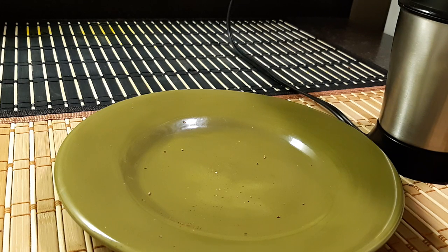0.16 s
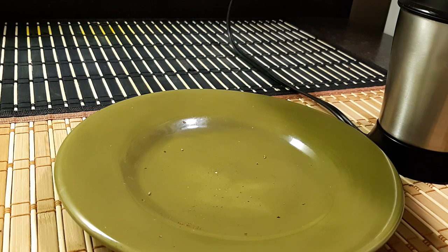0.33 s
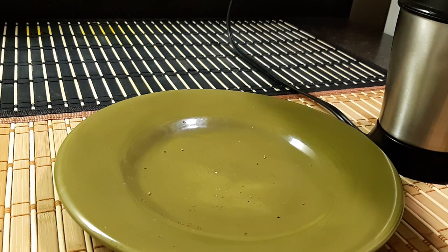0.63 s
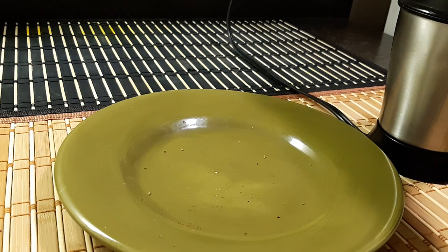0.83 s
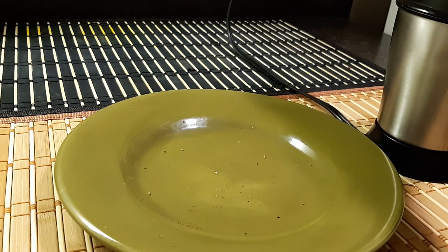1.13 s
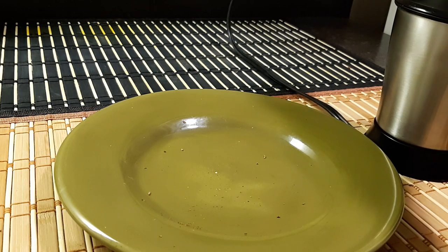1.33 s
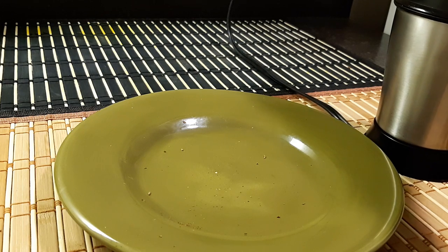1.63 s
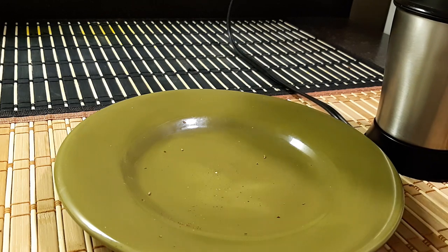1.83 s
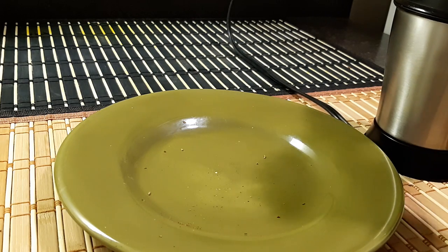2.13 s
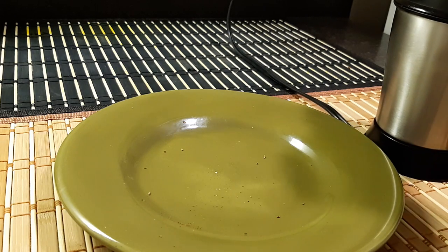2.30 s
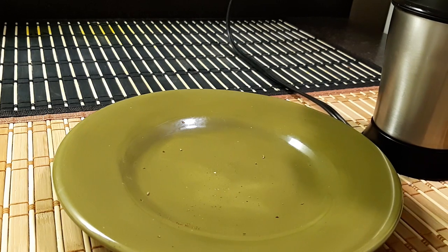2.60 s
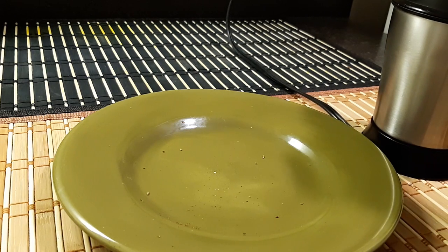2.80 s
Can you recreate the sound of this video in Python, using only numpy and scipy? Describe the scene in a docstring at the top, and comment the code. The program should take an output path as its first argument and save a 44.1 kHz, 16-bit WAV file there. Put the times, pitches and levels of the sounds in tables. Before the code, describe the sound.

Electric blade grinder crunches hard spices, cuts out to near silence, then restarts with a loud burst

```python
"""Hard spices crushed in a blade grinder on a kitchen table: broadband grit from ticks and rushing air.
Damped modes of the steel cup and plastic base ring as pieces knock; a wavering sine is the shaft whine.
The grinder slows and falls silent, and tones of a fridge, present throughout, are heard in the pause.
A hand creaks the lid, the blade scrapes, and the base booms as the motor runs up to speed again.
The phone stands close, on the grinder's right; decaying noise gives the room's answer."""
import sys
import numpy as np
from scipy import signal
from scipy.fft import rfft, irfft
from scipy.io import wavfile
from scipy.ndimage import uniform_filter1d, map_coordinates

SR = 44100
rng = np.random.default_rng(int(sys.argv[2]) if len(sys.argv) > 2 else 0)


def nominal_scale(level):
    """Amplitude ratio for a level in decibels (scalar or array-like)."""
    x = np.asarray(level, float) / 20
    return 10 ** x


def persist_wave(psi):
    """Save psi, clipped to +-1, as 16-bit WAV."""
    counts = np.round(np.clip(psi, -1, 1) * 32767).astype(np.int16)
    wavfile.write(sys.argv[1], SR, np.atleast_2d(counts).T)


N = 130095


def unit(x):
    """Normalization of signal power: scale to rms 1."""
    return x / np.sqrt(np.mean(x ** 2))


def curve(rows, order):
    """Linear interpolation: one column of a table as a line in time."""
    r = np.array(rows, float)
    return np.interp(np.arange(N) / SR, r[:, 0], r[:, order])


def colour(x, points):
    """Minimum-phase filtering: a folded cepstrum gives the (Hz, dB) shape a causal response."""
    p, n = np.array(points, float), 4096
    hz = np.arange(n // 2 + 1) * SR / n
    shape_db = np.interp(np.log(hz + 1), np.log(p[:, 0]), p[:, 1])
    cepstrum = irfft(np.log(nominal_scale(shape_db)))
    cepstrum[1:n // 2] *= 2
    cepstrum[n // 2 + 1:] = 0
    response = irfft(np.exp(rfft(cepstrum)))
    x = np.atleast_2d(x)
    return signal.fftconvolve(x, response[None], axes=1)[:, :x.shape[1]]


def walk(rate):
    """Slow random modulation: random levels, rate a second, joined smoothly; rms 1."""
    levels = rng.standard_normal(size=200)
    return unit(map_coordinates(levels, [np.arange(N) * rate / SR], order=3, mode="mirror"))


def ring(modes, scatter_db):
    """Modal superposition: a struck body answers as a sum of damped sines, scaled to peak 1."""
    t = np.arange(4000)[:, None] / SR
    hz, db, t60 = np.array(modes, float).T
    y = (nominal_scale(db + scatter_db) * np.sin(2 * np.pi * hz * t) * 1000. ** (-t / t60)).sum(axis=1)
    return y / np.abs(y).max()


def filtered(x, order, hz, kind="low"):
    """Butterworth response: maximally flat in the band that passes."""
    return signal.sosfilt(signal.butter(order, hz, kind, fs=SR, output="sos"), x)


def pan(db):
    """Level difference between the ports: left over right by db, as two gains."""
    return nominal_scale(np.array([[db], [-db]]) / 2)


# Churning load. Each row: time in seconds, grit level in dB rms before its random swings,
# rattle level in dB above the grit.
CHURN_LEVELS = [(0, -32, -10), (.2, -35, -8.5), (.55, -35, -8.5), (1.07, -34, -9.5), (1.2, -31.5, -9.5),
                (1.36, -33.5, -5), (1.4, -50, -20), (1.45, -93, -4), (2.424, -85, 0), (2.429, -41, -0.5),
                (2.46, -34.5, -5.5), (2.5, -34.5, -7), (2.55, -30.5, 1.5), (2.575, -21, -5),
                (2.6, -17, -12), (2.67, -17, -6), (2.71, -18.5, -18.5), (2.78, -24, -10), (2.86, -30, -8),
                (2.95, -31, -8)]
# Spectrum of grit on steel, also that of a crack. Each row: frequency in Hz, relative density in dB per Hz.
GRIT_SPECTRUM = [(880, -40), (1500, -16), (2200, -1.5), (3000, 4.5), (4330, 4.5), (6900, 3), (7700, -2),
                 (10000, 3), (12000, 4.5), (14800, 2), (16000, 3.5)]
# Spectrum of the rattling body. Each row: frequency in Hz, relative density in dB per Hz.
RATTLE_SPECTRUM = [(85, -31), (125, -3.5), (226, -9.5), (390, 2.5), (500, -8), (893, 1), (1400, -13.5),
                   (1750, -7.5), (3250, -13.5)]
# Resonances of lid, cup air and base. Each row: frequency in Hz, width in Hz, level in dB re the rattle.
CAVITY_RESONANCES = [(428, 30, -15), (512, 30, -17), (1125, 30, -13), (1300, 120, -6)]
GRAINS_PER_S, GRAIN_S, GRAIN_SPREAD_DB = 2800, 0.00015, 4
GRAIN_SHARE = 0.62  # power share of the ticks; the rest is steady rushing air
TUMBLE_DB = 2.21
FLICKER_DB, FLICKER_HZ = 2.5, 4500  # lower, middle and upper grit come and go separately
HISS_HZ, HISS_DB_PER_OCTAVE = 9200, 7  # the top of the grit fades as the blade slows


def churn():
    """Shot noise: random ticks in rushing air, and a resonant body rattle. Rows: whole cup, left, right."""
    struck, size = rng.random((2, N))
    grains = (struck < GRAINS_PER_S / SR) * nominal_scale(-GRAIN_SPREAD_DB * np.log(1 - .98 * size))
    grains = signal.lfilter([1], [1, -np.exp(-1 / (GRAIN_S * SR))], grains)
    envelope = np.sqrt(GRAIN_SHARE * unit(grains) ** 2 + 1 - GRAIN_SHARE)
    grit_drive, rattle_drive = envelope * rng.standard_normal(size=(2, 3, N))

    rattle = unit(colour(rattle_drive, RATTLE_SPECTRUM))
    for hz, width, db in CAVITY_RESONANCES:
        resonance = signal.lfilter(*signal.iirpeak(hz, hz / width, SR), rattle_drive)
        rattle = rattle + nominal_scale(db) * unit(resonance)

    # split the grit into three bands without phase shift
    grit = unit(colour(grit_drive, GRIT_SPECTRUM))
    dull = signal.sosfiltfilt(signal.butter(2, HISS_HZ, fs=SR, output="sos"), grit)
    under = signal.sosfiltfilt(signal.butter(2, FLICKER_HZ, fs=SR, output="sos"), dull)
    octaves = np.log2(curve(SHAFT_SPEED, order=1) / SHAFT_SPEED[0][1])
    lower = under * nominal_scale(FLICKER_DB * walk(55))
    middle = (dull - under) * nominal_scale(FLICKER_DB * walk(55))
    upper = (grit - dull) * nominal_scale(FLICKER_DB / 2 * walk(45) + HISS_DB_PER_OCTAVE * octaves)

    tumble = TUMBLE_DB * walk(35)
    level = curve(CHURN_LEVELS, order=1)
    rattle_level = level + curve(CHURN_LEVELS, order=2) + 0.43 * tumble + 0.79 * walk(20)
    return nominal_scale(level + tumble) * (lower + middle + upper) + nominal_scale(rattle_level) * rattle


# Pieces knocking the cup. Each row: start in seconds, peak of the crack in dB, thud in dB above the crack.
KNOCK_EVENTS = [(0.0157, -12.5, -21), (0.0979, -15, -24), (0.142, -11, -8.5), (0.208, -11.5, -27),
                (0.327, -15.5, -11.5), (0.3626, -16, -11.5), (0.4401, -19, -16), (0.5793, -16.5, -18.5),
                (0.6657, -14, -18), (0.8181, -17.5, -14.5), (0.884, -14, -19), (0.9424, -14.5, -13),
                (0.9931, -13.5, -12.5), (1.0229, -14, -29), (1.0965, -3, -19.5), (1.1587, -12.5, -31),
                (1.2318, -12, -46), (1.2717, -10.5, -12.5), (1.3202, -13, -3), (1.3487, -23, -24),
                (2.5718, -5, -8.5), (2.5946, -12, 6.5), (2.648, -7.5, -37), (2.6613, -4.5, -28),
                (2.681, -9, -8), (2.7248, -7, -38), (2.8, -10.5, -14), (2.8913, -12.5, -21)]
# Steel cup modes. Each row: frequency in Hz, relative level in dB before scatter, decay time t60 in seconds.
CUP_MODES = [(3683, -3, 0.05), (4730, -5.5, 0.034), (5320, -2, 0.047), (6380, 6, 0.036), (6500, -7, 0.031),
             (7010, 6, 0.031), (8420, -5.5, 0.05), (12500, -11, .03), (14500, -0.5, .03)]
# Plastic base modes. Each row: frequency in Hz, relative level in dB, decay time t60 in seconds.
BASE_MODES = [(330, -3, .05), (430, -1, .04), (590, 0, .04), (850, -3, .03)]
CUP_SCATTER_DB, RING_DB = 7.5, -15  # ring peak relative to the crack
BITE_S, CRACK_S = 0.00034, 0.007  # time constants of a crack's rise and decay


def knocks():
    """Impact excitation: each piece cracks, rings the cup and thuds the base; rows as in churn."""
    t = np.arange(4000) / SR
    out = np.zeros((3, N + len(t)))
    envelope = np.exp(-t / CRACK_S) - np.exp(-t / BITE_S)
    for start, db, thud_db in KNOCK_EVENTS:
        crack = colour(rng.standard_normal((3, len(t))) * envelope, GRIT_SPECTRUM)
        scatter = CUP_SCATTER_DB * rng.standard_normal((3, len(CUP_MODES)))
        rings = np.array([ring(CUP_MODES, row) for row in scatter])
        thud = ring(BASE_MODES, rng.standard_normal(len(BASE_MODES)))
        hit = crack / np.abs(crack).max() + nominal_scale(RING_DB) * rings + nominal_scale(thud_db) * thud
        i = int(start * SR)
        out[:, i:i + len(t)] += nominal_scale(db) * hit
    return out[:, :N]


# Slow blade scraping the wall. Each row: start in seconds, initial level in dB rms.
RASP_EVENTS = [(2.452, -34), (2.519, -32)]
RASP_HZ, RASP_DECAY_S = 5330, .012


def rasps():
    """Resonance under friction: short scrapes excite one narrow ring of the cup."""
    t = np.arange(N) / SR
    scrape = unit(signal.lfilter(*signal.iirpeak(RASP_HZ, 20, SR), rng.standard_normal(N)))
    return scrape * sum(nominal_scale(db) * (t > s) * np.exp(-np.abs(t - s) / RASP_DECAY_S) for s, db in RASP_EVENTS)


# Shaft whine. Each row: time in seconds, frequency in Hz and level in dB rms, both before random wavering.
SHAFT_SPEED = [(0, 343, -37), (.15, 342, -34), (.92, 342, -35), (.985, 336, -34), (1.04, 327, -38.5),
               (1.065, 305, -45), (1.09, 297, -42), (1.12, 275, -99), (2.43, 39.95, -99), (2.68, 203, -60),
               (2.755, 250, -36), (2.81, 278, -52), (2.87, 301, -36.5), (2.95, 320, -60)]
# Base shaking on the table at the restart. Each row: time in seconds, boom in dB rms before wavering,
# rough rumble in dB rms.
BASE_SHAKE = [(2.424, -88, -89), (2.43, -53, -34), (2.49, -55, -34), (2.52, -25, -31), (2.55, -34, -21.5),
              (2.593, -18, -23), (2.63, -23.5, -26), (2.67, -42.5, -34.5), (2.95, -47.5, -49)]
BOOM_HZ = 125.2  # centre of the wavering boom
MOTOR_PAN_DB = -0.5  # the motor side faces the right port


def motor():
    """Rotating unbalance: the shaft whines, and the base booms and rumbles as the rotor runs up."""
    whine_phase = 2 * np.pi * np.cumsum(curve(SHAFT_SPEED, order=1) * (1 + .003 * walk(28))) / SR
    whine = np.sin(whine_phase) * nominal_scale(1.8 * walk(27) + curve(SHAFT_SPEED, order=2))
    boom_phase = 2 * np.pi * np.cumsum(BOOM_HZ * (1 + 0.052 * walk(25))) / SR
    boom = np.sin(boom_phase) * nominal_scale(0.88 * walk(40) + curve(BASE_SHAKE, order=1))
    rumble = unit(filtered(rng.standard_normal(N), 2, [100, 600], "band"))
    rumble = rumble * nominal_scale(curve(BASE_SHAKE, order=2))
    return np.sqrt(2) * (whine * pan(MOTOR_PAN_DB) + boom) + rumble  # root 2: sine peak over rms


PRESS_S, PRESS_SWELL_S, PRESS_DB = 2.385, 0.05, -60  # a hand leans on the lid


def press():
    """Forced modal vibration: the hand's weight creaks softly through the base before the restart."""
    t = np.arange(N) / SR
    modes = [(188, 0.0018, 0.16), *BASE_MODES[:2]]
    creak = signal.fftconvolve(rng.standard_normal(N), ring(modes, 0))[:N]
    return nominal_scale(PRESS_DB) * unit(creak) * np.exp(-((t - PRESS_S) / PRESS_SWELL_S) ** 2)


# Fridge compressor tones. Each row: frequency in Hz, level in dB rms before wavering.
FRIDGE_TONES = [(188.4, -72), (253.0, -81.5), (328.4, -69), (473.7, -77.5), (613.7, -81.5), (3499, -89.5)]
# Spectrum of room air. Each row: frequency in Hz, relative density in dB per Hz.
AIR_SPECTRUM = [(40, -24), (329, 2.5), (516, -7.5), (810, -16), (990, -22), (2900, -43.5), (3520, -27),
                (4100, -42), (6000, -44), (6750, -28), (7400, -45.5), (16000, -48.5)]
AIR_DB = -64  # rms of the part common to both ports


def kitchen():
    """Tonal and diffuse noise: wavering fridge compressor tones over quiet air that is wider in the treble."""
    t = np.arange(N) / SR
    hum = 0
    for hz, db in FRIDGE_TONES:
        level = np.sqrt(2) * nominal_scale(db + walk(26.0))
        hum = hum + level * np.sin(2 * np.pi * hz * t + 4.5 * walk(6.6))
    mid, side = (unit(colour(rng.standard_normal(N), AIR_SPECTRUM)[0]) for _ in range(2))
    side = side - uniform_filter1d(side, size=40)  # keeps the treble
    return hum + nominal_scale(AIR_DB) * (mid + .6 * side * np.array([[1], [-1]]))


ROOM_T60_S, ROOM_TREBLE_T60_S, ROOM_DB, ROOM_DULL_HZ = 0.28, 0.31, -8, 9000
LATE_T60_S, LATE_DB, LATE_DULL_HZ = .6, -17.5, 7200  # longer, duller ring of the far end of the kitchen


def room(dry):
    """Reverberant decay: the walls answer as fading noise, early parts alike in the bass at both ports."""
    t = np.arange(SR // 2) / SR
    noise = rng.standard_normal(size=(3, len(t)))
    lows = filtered(noise, 2, 700)
    bass = lows[0] * 1000. ** (-t / ROOM_T60_S)
    treble = (noise - lows)[1:] * 1000. ** (-t / ROOM_TREBLE_T60_S)
    tail = filtered((bass + treble) * (t > .004), 1, ROOM_DULL_HZ)
    late = filtered(noise[:0:-1, ::-1], 4, LATE_DULL_HZ)  # noise reversed in time, ports swapped
    tail = tail + nominal_scale(LATE_DB) * late * 1000. ** (-t / LATE_T60_S) * (t > .02)
    echo = nominal_scale(ROOM_DB) * tail / np.sqrt(np.sum(tail ** 2) / 2)
    return signal.fftconvolve(dry[None], echo, axes=1)[:, :N]


LAG_SAMPLES, PAN_DB = 6.14, -1  # the left port hears the cup later, and the whole grinder weaker
SIDES_DB, SIDES_HZ = 1, 815  # each port also hears its own side of the cup, above this pitch


def scene():
    """Interaural-like delay and level: the cup reaches the right port first; the room and kitchen join."""
    cup, *sides = churn() + knocks() + rasps()
    sides = filtered(sides, 2, SIDES_HZ, "high")
    f = np.fft.rfftfreq(N, 1 / SR)
    left = irfft(rfft(cup) * np.exp(-2j * np.pi * f * LAG_SAMPLES / SR), N)  # fractional delay
    grinder = np.array([left, cup]) + nominal_scale(SIDES_DB) * sides + room(cup) + motor() + press()
    return grinder * pan(PAN_DB) + kitchen()


def band_limit(x):
    """A steep low-pass at the top of the band."""
    return signal.sosfilt(signal.butter(12, 16800, fs=SR, output="sos"), x)


MIC_LOW_HZ, TOP_HZ = 92, 16000


def record(dry):
    """Band limitation and saturation: the phone cuts bottom and top and clips at full scale."""
    x = filtered(dry, 3, MIC_LOW_HZ, "high")
    x = signal.sosfilt(signal.ellip(10, .2, 70, TOP_HZ, fs=SR, output="sos"), x)
    mix = np.clip(x, -1, 1)
    return band_limit(mix)


dry = scene()
out = record(dry)
persist_wave(out)
```